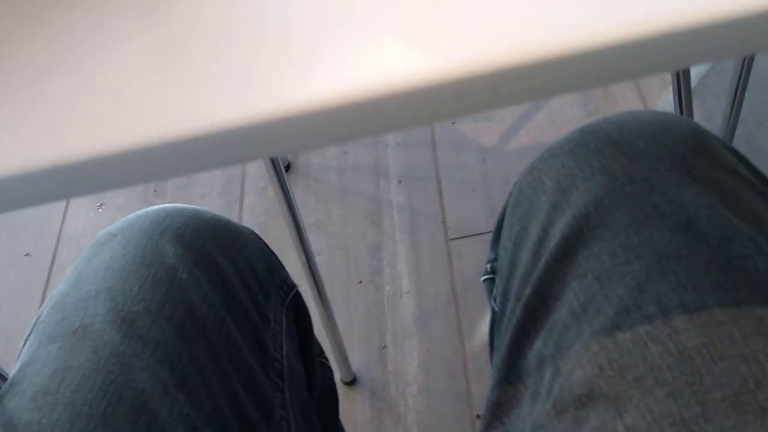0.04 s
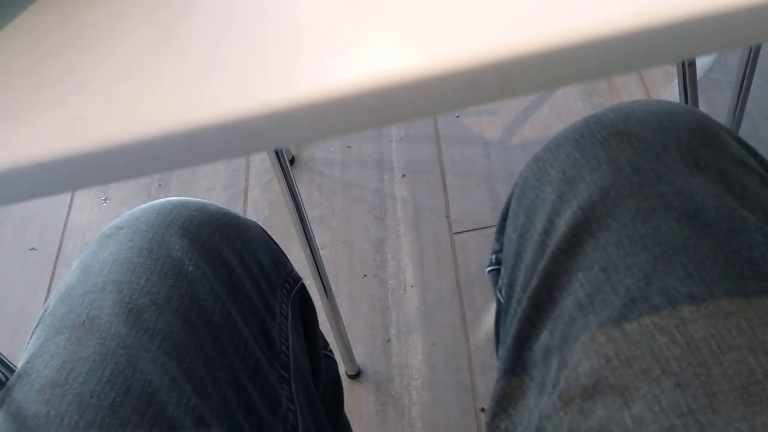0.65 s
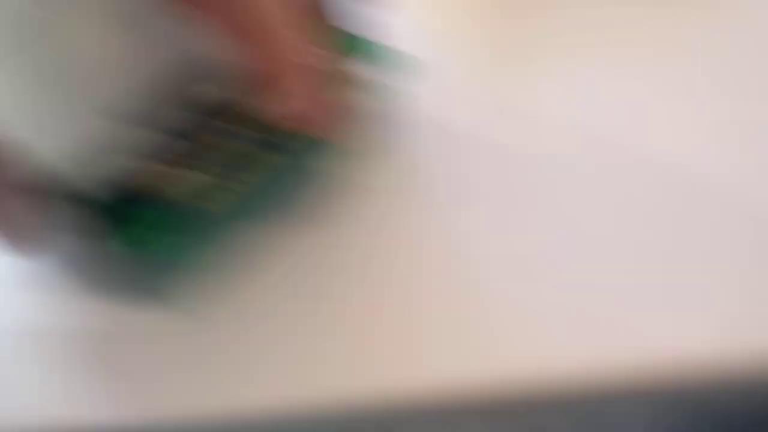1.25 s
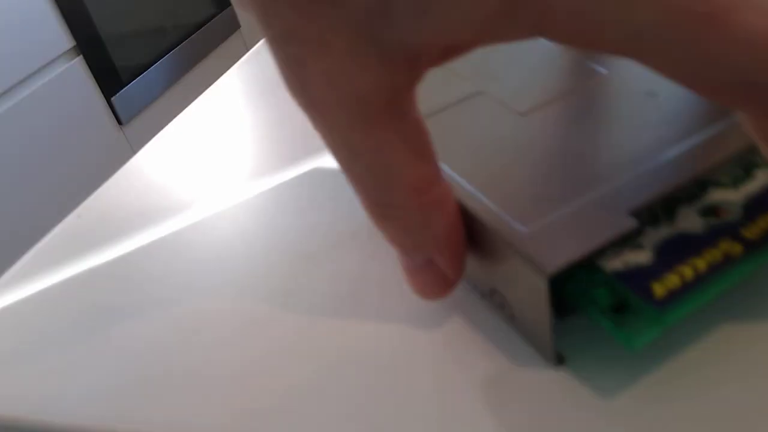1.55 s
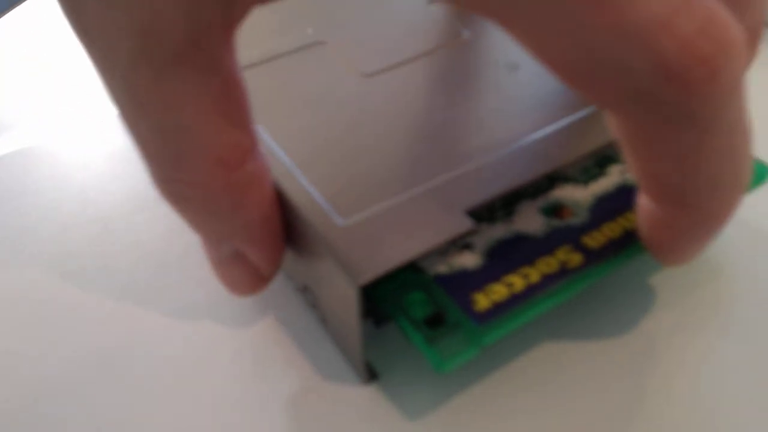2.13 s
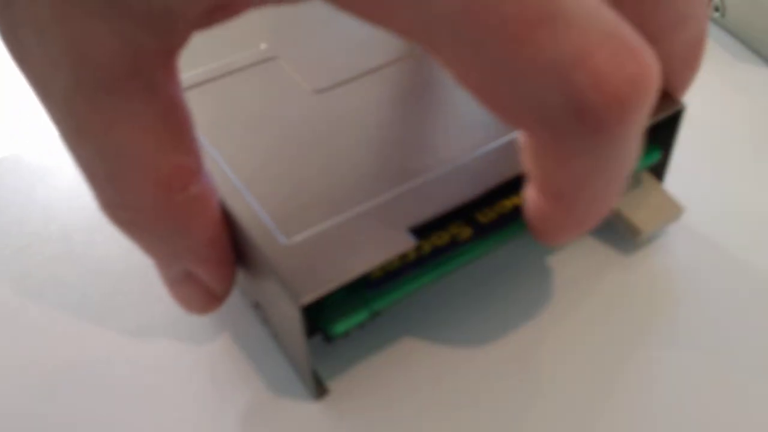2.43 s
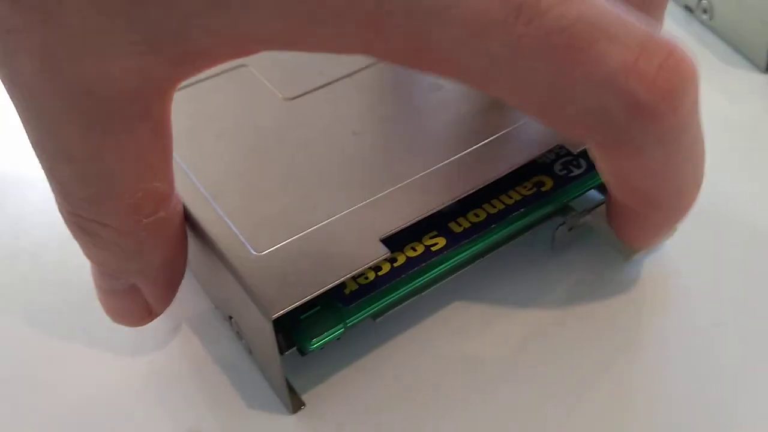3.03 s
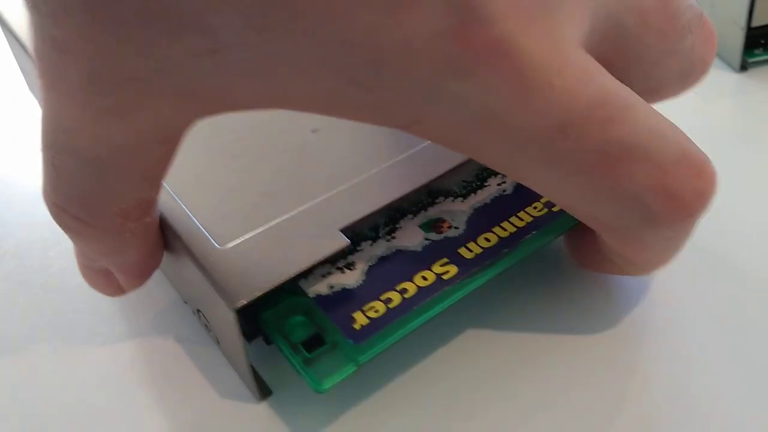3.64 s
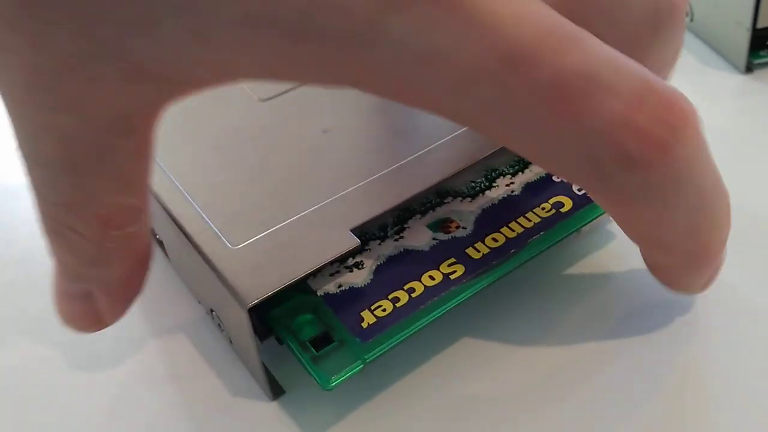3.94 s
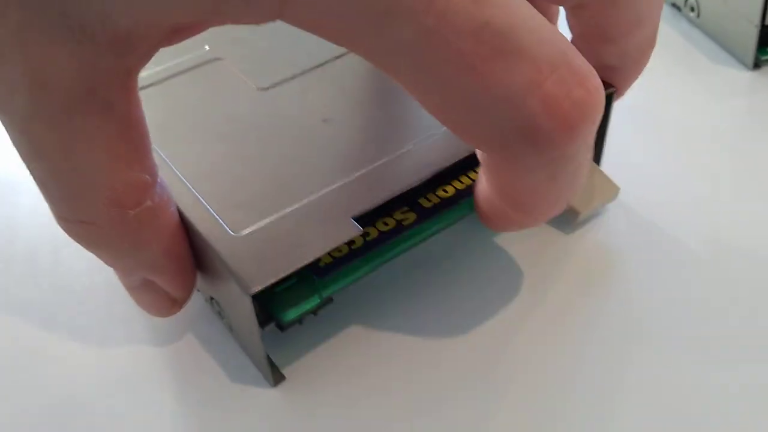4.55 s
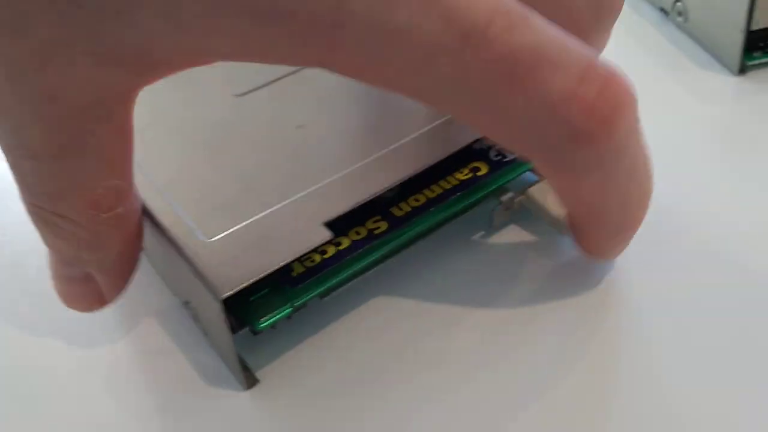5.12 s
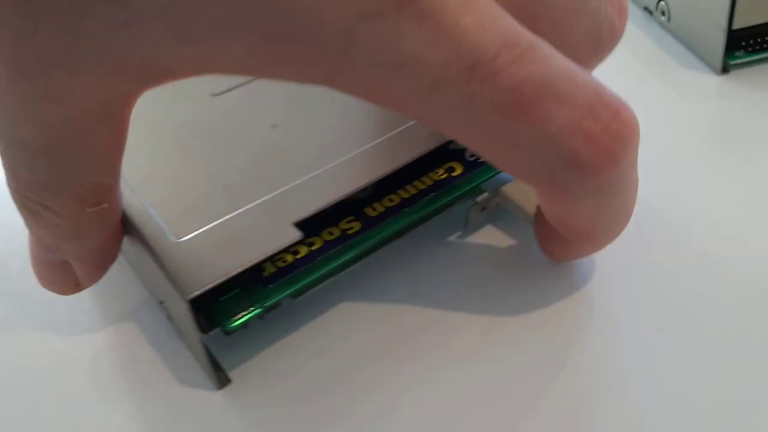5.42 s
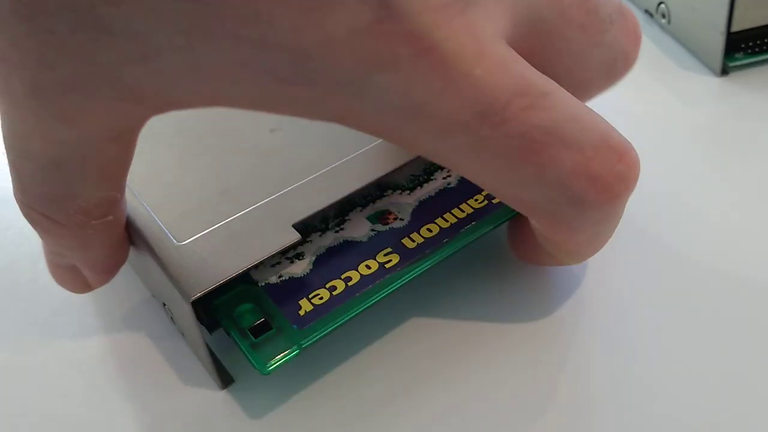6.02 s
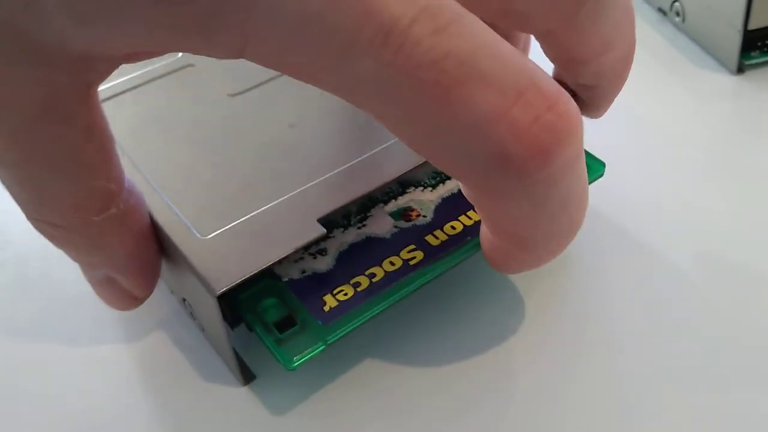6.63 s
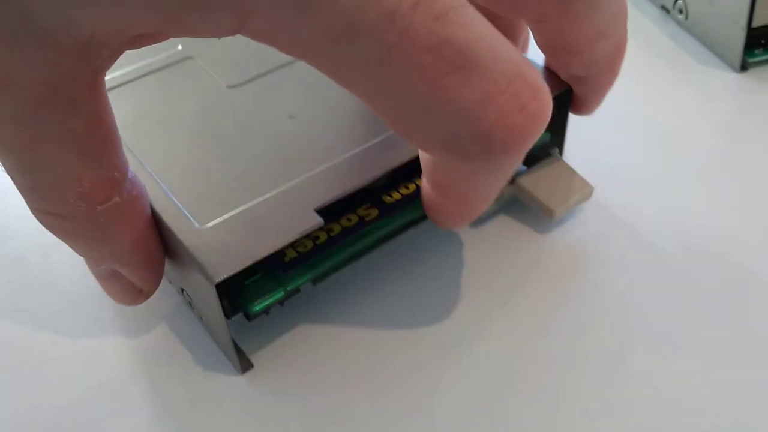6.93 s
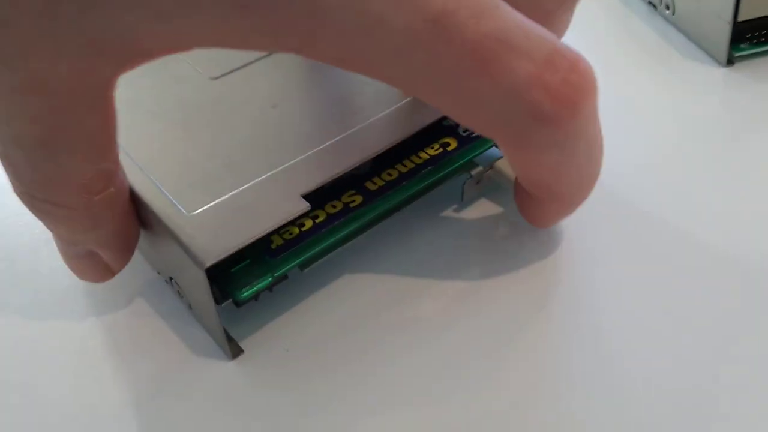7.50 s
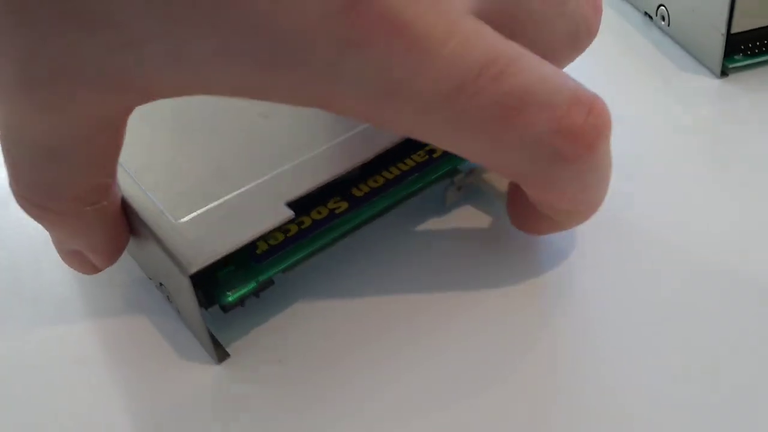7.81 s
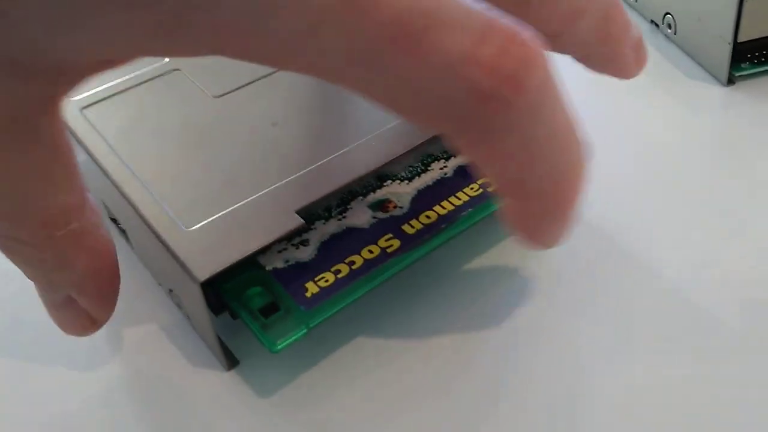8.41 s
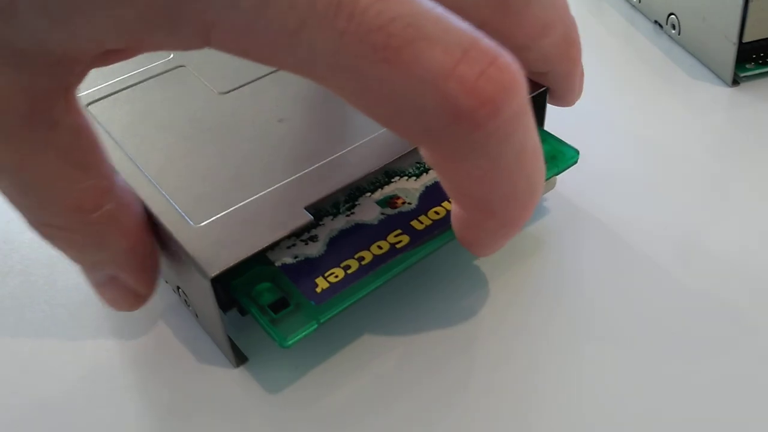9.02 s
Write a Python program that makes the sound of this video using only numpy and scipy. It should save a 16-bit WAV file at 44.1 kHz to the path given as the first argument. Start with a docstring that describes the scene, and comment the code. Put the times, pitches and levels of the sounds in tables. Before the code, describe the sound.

A floppy disk is repeatedly ejected from and pushed into a drive, with sharp metallic snaps and clacks over soft ventilation.

```python
"""A floppy disk goes in and out of a bare drive, close to a camera, over room ventilation.
First, drive in hand, the button scrapes, the cradle springs up and the disk shoots against its stop.
Then, on a table, three times: the disk slides in, its shutter snaps open, the spring-loaded cradle slams
down, and the disk is ejected again. Each slam makes the camera's gain duck and creep back.
Last, a fourth push gets as far as the shutter."""
import sys
import numpy as np
from scipy import signal
from scipy.fft import rfft, irfft, next_fast_len
from scipy.io import wavfile
from scipy.ndimage import uniform_filter1d, minimum_filter1d, map_coordinates

SR = 44100
rng = np.random.default_rng(int(sys.argv[2]) if len(sys.argv) > 2 else 0)


def inscribe(sig):
    """Save sig as 16-bit PCM at rate SR to the path in sys.argv[1].

    A 1-D sig is mono; a 2-D sig holds one channel per row.
    Samples are clipped to [-1, 1] before scaling.
    """
    pcm = np.round(np.clip(np.atleast_2d(sig).T, -1, 1) * 32767)
    wavfile.write(sys.argv[1], SR, pcm.astype(np.int16))


N = 408366


def amp(db):
    """Decibels to gain."""
    return 10 ** (np.asarray(db) / 20)


def unit(x):
    """Scale to rms 1."""
    return x / np.sqrt(np.mean(x ** 2) + 1e-20)


def along(points, hz):
    """(f/Hz, value) points read on a log axis."""
    f, v = np.transpose(points)
    return np.interp(np.log(hz + 1), np.log(f + 1), v)


def wobble(rate_hz):
    """Random knots joined by straight lines."""
    knots = rng.standard_normal(int(N * rate_hz / SR) + 4)
    return map_coordinates(knots, [np.arange(N) * rate_hz / SR], order=1)


def resonance(hz, centre_hz, width_hz):
    """Causal resonance, gain 1 at its centre."""
    return 1j * hz * width_hz / (centre_hz ** 2 - hz ** 2 + 1j * hz * width_hz)


def filtered(x, response):
    """Apply a frequency response."""
    m = next_fast_len(N + SR // 4)
    return irfft(rfft(x, m) * response(np.fft.rfftfreq(m, 1 / SR)), m)[..., :N]


def coloured(x, tone):
    """Apply an (f/Hz, level/dB) curve."""
    return filtered(x, lambda hz: amp(along(tone, hz)))


def minimum_phase(gain):
    """Causal response with this gain, by folding the cepstrum."""
    c = irfft(np.log(np.maximum(gain, 1e-6)))
    half = len(c) // 2
    return np.exp(rfft(np.r_[c[0], 2 * c[1:half], c[half], np.zeros(half - 1)]))


def add(track, start_s, sound):
    """Mix a sound into the track."""
    part = track[:, round(start_s * SR):][:, :sound.shape[1]]
    part += sound[:, :part.shape[1]]


def ventilation():
    """Steady air noise with narrow fan tones and a thin whine."""
    air_tone = [(25, -34), (60, -14.5), (130, -9.5), (260, -4), (340, -2), (420, -5.5), (700, -6.5),
                (1300, -10), (2000, -18), (3300, -18), (5500, -20.5), (8000, -26.5), (11000, -33),
                (14200, -36.5)]  # air spectrum: f/Hz, level/dB
    hum = [(335.2, 23, -56), (693, 20, -62.5), (14000, 90, -85.5)]  # fan tones, whine: f/Hz, width/Hz, level/dB
    air = unit(coloured(rng.standard_normal((2, N)), air_tone))
    hz = np.fft.rfftfreq(N, 1 / SR)
    lines = sum(amp(db) * unit(np.abs(resonance(hz, f, width)) ** 2) for f, width, db in hum)
    tones = irfft(rfft(rng.standard_normal((2, N))) * lines, N)
    return amp(-47.5 + 0.17 * wobble(13)) * air + tones


def room(x, size=32768):
    """Sound sent in different directions returns with different tails, the treble dying first."""
    decay = [(100, 0.11), (400, 0.59), (1500, 0.66), (3500, 0.62), (6000, 0.54), (9000, 0.43),
             (14000, 0.067)]  # reverberation time: f/Hz, t60/s
    tone = [(200, 12.5), (700, 2.5), (1100, 1.5), (1700, 3.5), (3300, 0.5), (4100, -5), (5100, -4.5),
            (6200, -1), (9000, -3.5), (14000, 9)]  # tail colour: f/Hz, level/dB
    wet = np.zeros((2, N))
    for start in range(0, N, size):
        hz, t, noise = signal.stft(rng.standard_normal((2, 2, size)), SR, nperseg=256)
        envelope = amp(-60 * t / along(decay, hz)[:, None]) * (1 - np.exp(-t / 0.0027))
        tails = signal.istft(noise * envelope, SR, nperseg=256)[1]
        tails /= np.linalg.norm(tails[0])
        add(wet, start / SR, signal.fftconvolve(x[None, :, start:start + size], tails, axes=2).sum(1))
    return coloured(wet, tone)


def low_thumps(size=8192):
    """Short dull low thumps."""
    thumps = [(2.406, -42.5), (2.541, -33), (3.766, -33.5), (3.852, -35), (5.829, -43)]  # thumps: t/s, level/dB
    notes = [(62, -11, 0.17), (131, -2.5, 0.31), (215, 0, 0.16)]  # low notes of the thump: f/Hz, level/dB, t60/s
    track, t = np.zeros((2, N)), np.arange(size) / SR
    thump = sum(np.sin(2 * np.pi * hz * t) * amp(db - 60 * t / t60) for hz, db, t60 in notes)
    thump *= 1 - np.exp(-t / 0.01)
    for s, db in thumps:
        add(track, s, np.outer([amp(db), 0], thump))
    return track


def stroke(start_s, rise_s, hold_s, db, swell_db, drift_db_per_s, stop_db_per_s=351.5):
    """Gain of one rub: it swells, drifts, then dies as the part stops."""
    t = np.arange(N) / SR - start_s
    onset_db = swell_db * np.minimum(t / rise_s - 1, 0)
    drift_db = drift_db_per_s * np.clip(t - rise_s, 0, hold_s)
    fall_db = stop_db_per_s * np.maximum(t - rise_s - hold_s, 0)
    return amp(db + onset_db + drift_db - fall_db)


def sliding(press_rise_s=0.042, slips_per_s=900):
    """Plastic on steel, a gritty hiss: fading as the spring brakes the disk, growing under the button."""
    pushes = [(2.21, 0.12, .04, -36), (4.31, .11, .07, -44.5), (4.485, 0.054, .12, -32.5),
              (6.759, 0.15, .07, -31), (9.08, 0.1, .07, -36)]  # disk in its guides: t/s, rise/s, glide/s, level/dB
    presses = [(0.15, 0.12, -44.5), (3.35, 0.47, -45.5), (5.481, .04, -46.5), (5.815, 0.17, -40.5),
               (7.764, 0.25, -44.5)]  # button loading the spring: t/s, length/s, level/dB
    disk = sum(stroke(*push, swell_db=23, drift_db_per_s=-46) for push in pushes)
    button = sum(stroke(s - press_rise_s, press_rise_s, hold_s, db, swell_db=10.5, drift_db_per_s=15.5)
                 for s, hold_s, db in presses)
    envelope = (disk + button) * amp(1.1 * wobble(70))
    slips = (rng.random(N) < slips_per_s / SR) * rng.standard_normal((2, N))
    grit = rng.standard_normal((2, N)) + 0.7 * unit(slips)
    tone = [(60, -12), (300, -4.5), (800, 4.5), (1500, 8), (2400, -1), (3300, 2), (5400, 1.5), (8000, -6),
            (11000, -15), (14200, -21)]  # friction spectrum: f/Hz, level/dB
    return amp(-3.5) * envelope * unit(coloured(grit, tone))


def contact(tone, db, tilt_db_per_oct, lid_db, t60_s, attack_s, ring_db, size=16384):
    """One blow (mid, side): a crack of dense modes, then the chassis rings on faintly."""
    chassis = [(689, 11, 0.39), (913, 2, 0.66), (1198, 2.5, 0.8), (1624, -7, 0.22), (1688, 2.5, 0.61),
               (1857, 10, 0.37), (3230, 5.5, 0.45), (3530, 3, 0.15), (4100, -27, 0.39), (4200, -11, 0.12),
               (4640, -5, .15), (5730, 8.5, 0.21), (5500, 6.5, 0.1), (7300, -11.5, .3), (8400, 8, 0.083),
               (11600, 1.5, .1)]  # sheet-steel modes: f/Hz, level/dB, t60/s
    lid = [(1500, 310, 0.54), (3310, 160, 1)]  # lid resonances: f/Hz, width/Hz, share of lid_db
    t, hz = np.arange(size) / SR, np.fft.rfftfreq(size, 1 / SR)
    rise = 1 - np.exp(-t / attack_s)
    crack = rfft(rng.standard_normal((2, size)) * rise * amp(-60 * t / t60_s))
    band_power = np.abs(uniform_filter1d(np.abs(crack) ** 2, size=160, axis=1))
    crack /= np.sqrt(band_power + 1e-12)  # a hard blow excites all bands alike
    f, mode_db, mode_t60_s = np.transpose(chassis)[:, :, None]
    strength = amp(mode_db + ring_db + 2 * rng.standard_normal(f.shape)) * rng.choice([-1, 1], f.shape)
    ring = (strength * amp(-60 * t / mode_t60_s) * np.sin(2 * np.pi * f * t)).sum(0) * rise
    colour_db = along(tone, hz) + tilt_db_per_oct * np.log2(np.maximum(hz, 500) / 3000)
    colour_db += lid_db * sum(share * np.abs(resonance(hz, fc, width)) for fc, width, share in lid)
    radiation = (hz ** 2 + 1) / (hz ** 2 + 90 ** 2)  # small plates give off little bass
    blow = irfft((crack + rfft(ring)) * minimum_phase(radiation * amp(colour_db)))
    blow *= np.cos(np.pi / 2 * t / t[-1]) ** 2
    peak_power = uniform_filter1d(blow[0] ** 2, size=220, mode="constant").max()  # loudest 5 ms
    return amp(db) * blow / np.sqrt(peak_power)


def strikes(rows, tone, gain_db, t60_s, attack_s, ring_db):
    """All contacts of one kind; the lid column is optional."""
    track = np.zeros((2, N))
    for s, db, tilt, *lid_db in rows:
        add(track, s, contact(tone, db + gain_db, tilt, sum(lid_db), t60_s, attack_s, ring_db))
    return track


def clustered(rows, tone, bursts, attack_s, ring_db):
    """Each event as a few bursts, milliseconds apart."""
    return sum(strikes([(s + lag_s, *blow) for s, *blow in rows], tone, db, t60_s, attack_s, ring_db)
               for lag_s, db, t60_s in bursts)


def finger_ticks(held_until_s=1):
    """Button, linkage and disk shell tick; the lid rings freely while the drive is in hand."""
    ticks = [(0.105, -37, 5), (0.148, -31, 5.5), (0.176, -33, 4), (0.209, -29, 1.5), (0.233, -33, 8.5),
             (0.365, -37, 10), (0.397, -23.5, 3.5), (0.601, -19, 3), (2.069, -39.5, -2.5),
             (2.227, -29.5, 1.5), (3.464, -18.5, -1.5), (3.533, -32, 5.5), (3.576, -24, 6),
             (3.764, -10, 1.2), (4.332, -33.5, -2), (4.412, -32.5, -1), (5.82, -30, -2), (5.858, -23, 9),
             (6.103, -19, 4), (6.758, -31.5, 1.5), (7.774, -24, -0.5), (7.874, -20, 2.3), (7.941, -25.5, 7),
             (8.147, -21.5, 3.5), (8.191, -17.5, 4.5), (8.671, -41, 3), (9.124, -32, 0),
             (9.149, -25.5, 0.5)]  # light contacts: t/s, level/dB, tilt/(dB/oct)
    tone = [(40, -15.5), (300, -7.5), (900, 0), (1600, 3), (2600, -8.5), (3500, -1.5), (5400, -2.5),
            (8000, -15), (11000, -26.5), (14200, -33.5)]  # tick spectrum: f/Hz, level/dB
    taps = [(s, db, tilt, 8 * (s < held_until_s)) for s, db, tilt in ticks]
    return strikes(taps, tone, gain_db=-6, t60_s=0.031, attack_s=0.00057, ring_db=-64.5)


def shutter():
    """A lever catches the shutter and snaps it open."""
    snaps = [(2.3515, -22.5, -1.3), (2.3808, -20, -0.21), (4.5792, -9, 1.97), (6.8938, -11, 1.4),
             (9.2368, -16, 0.38)]  # lever contacts: t/s, level/dB, tilt/(dB/oct)
    tone = [(40, -26.5), (250, -11), (700, -6), (1600, -2.5), (2500, -12), (4000, 3.5), (4900, -1),
            (5500, 3.5), (6500, -8.5), (7900, 3), (9300, -15), (12000, -16), (14200, -22.5)]  # snap spectrum: f/Hz, level/dB
    return strikes(snaps, tone, gain_db=-3, t60_s=0.025, attack_s=0.0009, ring_db=-63.5)


def disk_stop():
    """The ejected disk hits its stop and bounces."""
    hits = [(0.4485, -3.5, -1, -6), (3.635, 0.5, 1.5, 5.5), (3.6432, -15.5, -0.83, 5.5),
            (5.9578, -2, 0.058, 11.5), (5.9647, -9, -1.5, 2), (8.0215, -14, -3.5, 10)]  # impacts: t/s, level/dB, tilt/(dB/oct), lid/dB
    tone = [(40, -35.5), (300, -24), (1000, -22), (1600, -5), (2300, -10), (3200, -10.5), (4200, -6.5),
            (5050, 8), (6000, -15), (8200, -10.5), (10500, -22), (14200, -37.5)]  # impact spectrum: f/Hz, level/dB
    return strikes(hits, tone, gain_db=1.5, t60_s=0.0069, attack_s=0.0019, ring_db=-66)


def cradle_up():
    """The catch slips and the spring throws the cradle up."""
    throws = [(0.4135, -3.5, 0.48, 7.5), (3.6005, -3, 0.17, -7.5), (5.9222, -3.5, 0.36, -9),
              (7.984, -6.5, 0.97, -7)]  # ejections: t/s, level/dB, tilt/(dB/oct), lid/dB
    tone = [(40, -37), (200, -21.5), (700, -11.5), (1600, -0.5), (2400, -9), (3300, 3), (4100, 2.5),
            (4700, -1), (5500, 2.5), (6400, -8), (7800, -1.5), (9500, -12), (12000, -15.5), (14200, -19)]  # throw spectrum: f/Hz, level/dB
    release = [(-.003, -16.5, 0.0078), (0, 3.5, 0.021), (.003, -5, .028)]  # steps of a throw: lag/s, level/dB, t60/s
    return clustered(throws, tone, release, attack_s=0.00079, ring_db=-68.5)


def cradle_down():
    """The cradle slams onto the frame and seats the disk."""
    slams = [(2.537, 6.7, 0.71), (4.6845, 5, -0.51), (6.9905, 5.6, -0.082)]  # insertions: t/s, level/dB, tilt/(dB/oct)
    tone = [(40, -26.5), (250, -23.5), (600, -14), (1150, -5), (1650, -3.5), (2500, -12.5), (3300, -4.5),
            (4100, 0), (5600, -6.5), (6600, -14), (8000, -10.5), (9300, -20), (11700, -23.5),
            (14200, -28.5)]  # slam spectrum: f/Hz, level/dB
    # faint lead-in that softens the onset, then three steps of the slam: lag/s, level/dB, t60/s
    bursts = [(-.0062, -11.5, 0.0051), (-.004, -2, 0.026), (0, 1, 0.0069), (.005, -2, .028)]
    return clustered(slams, tone, bursts, attack_s=0.0017, ring_db=-68.5)


def scene():
    """The drive in the room; midrange nearly mono, treble wide and slightly right."""
    width = [(40, -7), (130, -12), (300, -18), (1300, -34), (2400, -20), (3700, -14), (5500, -11),
             (8000, -10), (14000, -8)]  # stereo width: f/Hz, side gain/dB
    lean = [(1500, 0), (3700, 0), (5500, -3), (8000, -1.5), (12000, -1)]  # balance: f/Hz, left minus right/dB
    slam, eject, stop = cradle_down(), cradle_up(), disk_stop()
    rest = eject + shutter() + finger_ticks() + sliding()
    wet = room(amp(-13) * slam + amp(-17) * stop + amp(-6.5) * rest)
    mid, side = slam + stop + rest + low_thumps() + wet + ventilation()
    side = coloured(side, width)
    stereo = np.array([mid + side, mid - side])
    return filtered(stereo, lambda hz: amp(np.outer([0.5, -0.5], along(lean, hz))))


def gain_control(x, limit_db, recovery_db_per_s):
    """Sharp sounds pull the gain down at once; it climbs back slowly."""
    edge_power = np.abs(uniform_filter1d((np.diff(x, prepend=0) ** 2).mean(0), size=220))
    over_db = np.maximum(10 * np.log10(edge_power + 1e-12) - limit_db, 0)
    climb_db = recovery_db_per_s * np.arange(N) / SR
    gain_db = climb_db - np.maximum.accumulate(over_db + climb_db)
    return x * amp(uniform_filter1d(minimum_filter1d(gain_db, size=440), size=130))


def record(dry):
    """Camera: port notches, gain control, converter hiss, clipping, band limit."""
    notches = [(2294, 1200, 0.76), (4537, 1300, 0.73), (6640, 1400, 0.6)]  # microphone port: f/Hz, width/Hz, depth 0-1
    top_hz = 14380
    port = lambda hz: np.prod([1 - depth * resonance(hz, f, bw) for f, bw, depth in notches], axis=0)
    ducked = gain_control(filtered(dry, port), limit_db=-14.5, recovery_db_per_s=7)
    hiss = amp(-88) * rng.standard_normal((2, N))
    return filtered(np.clip(ducked + hiss, -1, 1), lambda hz: 1 / np.sqrt(1 + (hz / top_hz) ** 200))


dry = scene()
out = record(dry)
inscribe(out)
```